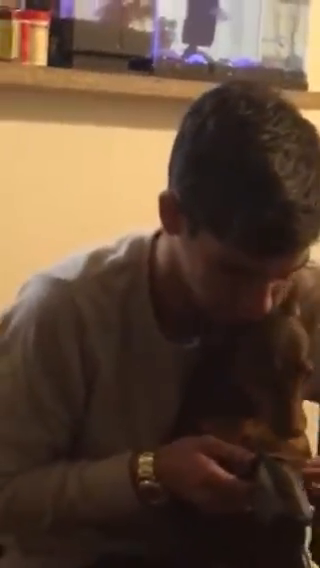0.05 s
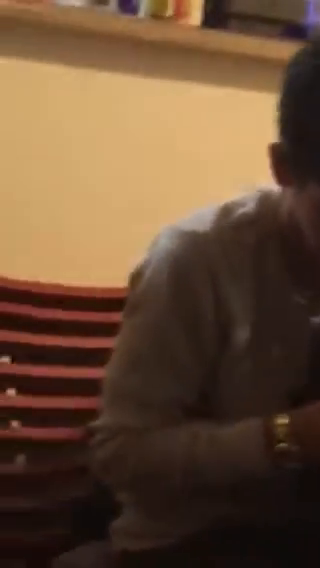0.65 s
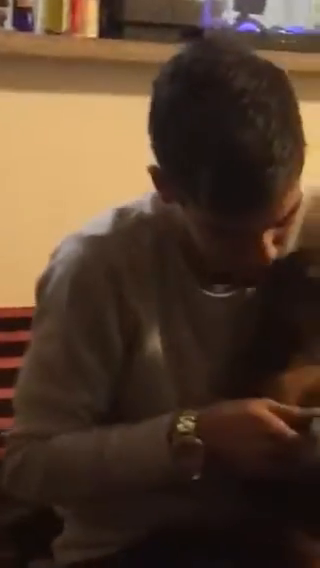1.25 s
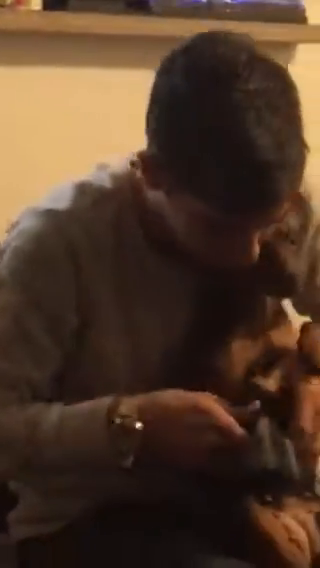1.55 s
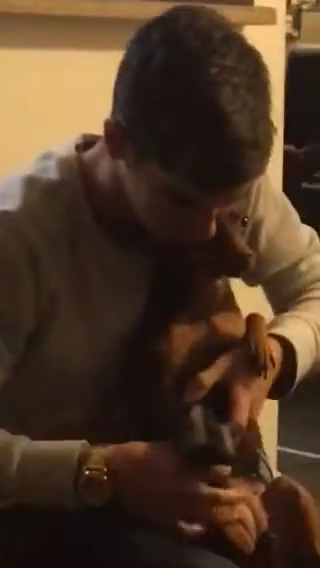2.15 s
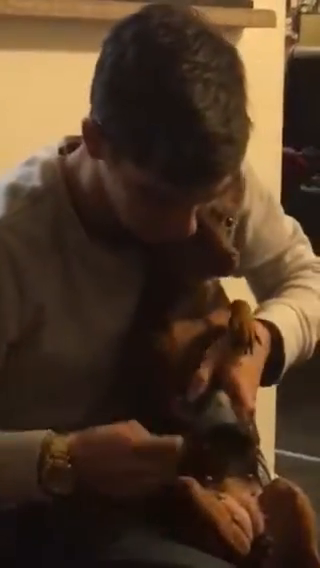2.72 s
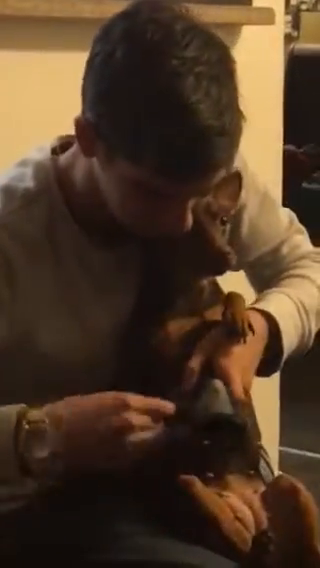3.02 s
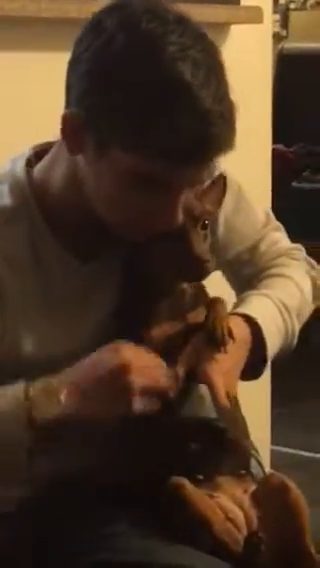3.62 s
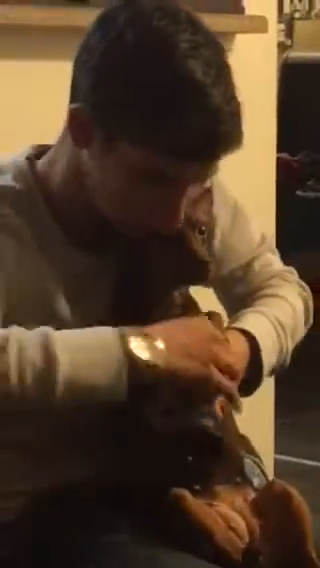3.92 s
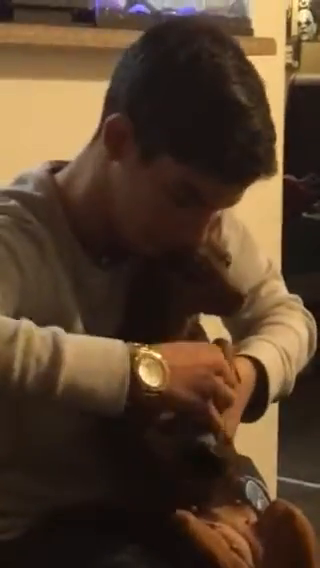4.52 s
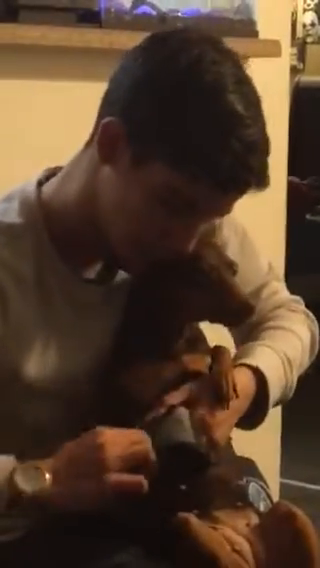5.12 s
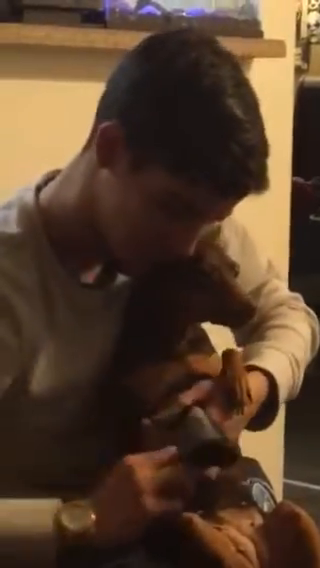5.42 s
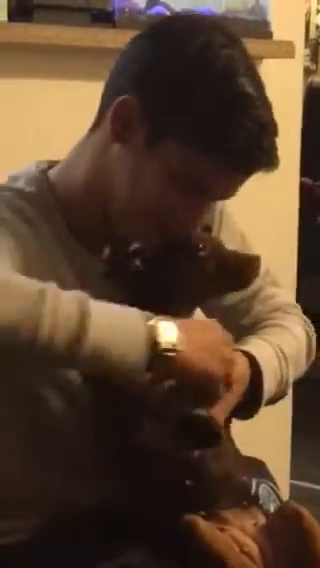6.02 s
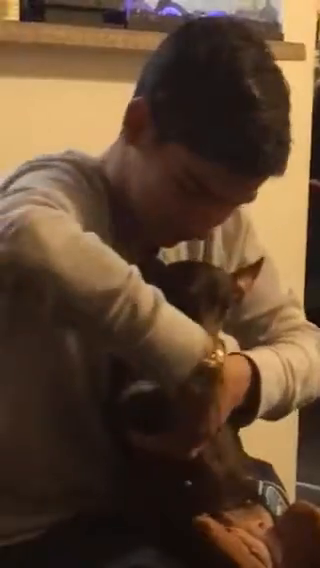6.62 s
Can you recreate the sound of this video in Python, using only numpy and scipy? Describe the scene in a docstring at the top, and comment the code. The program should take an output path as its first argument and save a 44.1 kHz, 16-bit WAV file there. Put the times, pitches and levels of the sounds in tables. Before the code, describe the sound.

A small fabric boot is being fitted on a dog's paw, close to one microphone in a living room with a short echo. An appliance's faint, low hum and thin hiss run steadily throughout. From the start, soft cloth rustle mixes with irregular light ticks of a hook-and-loop strap catching, and now and then a tiny hollow tap from the boot. Sharper clicks stand out at about 1.0, 2.0, 2.4 and 3.8 seconds. From about 4.7 to 5.5 seconds the strap peels open in a series of crisp, crackling jerks, much louder than anything else, densest around 4.9 seconds and thinning to a few separate snaps, with a brief swish of cloth near 5.4 seconds. Afterwards the quiet fingering goes on, with a few small ticks and taps around 5.7 to 6.2 seconds and faint rustling until the end, near 6.8 seconds.

```python
"""Cloth rustles and a hook-and-loop strap ticks close to the microphone, over an appliance's steady hum:
a small fabric boot is being fitted on a dog's paw in a living room, now and then giving a hollow tap.
From about 4.7 s the strap peels open in jerks, each freeing rows of snapping hooks; then the fingering
goes on. Lap, chest and a near wall reflect the handling into one microphone, ahead of a short room tail."""
import sys
import numpy as np
from scipy import signal
from scipy.fft import rfft, irfft, next_fast_len
from scipy.io import wavfile
from scipy.ndimage import map_coordinates

SR = 44100
rng = np.random.default_rng(int(sys.argv[2]) if len(sys.argv) > 2 else 0)


def digitize_waveform(pressure):
    """Quantize a signal to 16-bit integers and store it at the path in sys.argv[1].

    Rows of a 2-D input are taken as channels; values are limited to [-1, 1].
    """
    field = np.atleast_2d(pressure).T
    bounded = np.clip(field, -1, 1)
    quanta = np.round(bounded * 32767).astype(np.int16)
    wavfile.write(sys.argv[1], SR, quanta)


N = 297994

# The appliance's motor hum: mains_multiple, level_db
MOTOR_HUM = [(1, -69.5), (2, -59.5), (3, -70.5), (4, -73.5), (5, -77), (6, -75.5), (7, -81), (8, -84.5),
             (11, -84.5), (12, -85)]
# Tones of its rotating parts: pitch_hz, level_db
FAN_TONES = [(54.5, -82.5), (107.7, -72), (140.6, -78), (215.3, -66.5), (230.1, -76), (323, -78),
             (460.3, -89), (470.4, -78.5), (539, -84)]
# Thin whistles of the motor: pitch_hz, level_db
MOTOR_WHISTLES = [(2040, -92.5), (2821, -90), (2939, -93), (3720, -93.5)]
# Outline of the upper mains harmonics: frequency_hz, level_db
BUZZ_SPECTRUM = [(780, -99), (1250, -92.5), (1750, -101), (2500, -100), (2900, -100.5), (3100, -103)]
# Low background rumble: frequency_hz, gain_db
RUMBLE_SPECTRUM = [(20, -42), (35, -9), (55, -0.5), (80, -11), (112, 2.5), (128, -3.5), (145, -1.5),
                   (195, 0.5), (210, -7), (255, -4.5), (330, -15.5), (500, -35)]
# Room hiss: frequency_hz, gain_db
HISS_SPECTRUM = [(180, -35), (300, -2.5), (385, -8), (520, -8), (700, -11), (900, -14), (1210, -15),
                 (1750, -23.5), (2800, -25), (4500, -29.5), (8000, -27), (16000, -37)]
# Resonances in the appliance's hiss: centre_hz, width_hz, gain_db
WHINE_MODES = [(2540, 200, -8), (3770, 200, -14), (5850, 260, -8)]

# How busy the fingers are, as a relative rustle level: time_s, level_db
FINGERING = [(0, -67), (.2, -79), (.87, -93), (.95, -66), (1.18, -72.5), (1.33, -61), (1.42, -76),
             (1.85, -63.5), (2.3, -72.5), (2.6, -63.5), (2.8, -74.5), (3.3, -65.5), (3.45, -75.5),
             (3.98, -66), (4.5, -83), (5.64, -71.5), (5.77, -66.5), (6.4, -69), (6.6, -63.5), (6.76, -82)]
# Cloth, strap and fur sliding on each other, levels relative: middle_s, length_s, level_db
CLOTH_STROKES = [(0.355, 0.085, -59.5), (2.013, 0.061, -53.5), (2.144, .16, -64), (2.467, 0.1, -63),
                 (2.97, 0.067, -66), (4.27, 0.23, -64), (4.635, 0.075, -54), (4.895, 0.27, -51),
                 (5.381, 0.091, -47)]
# Colour of sliding cloth: frequency_hz, gain_db
CLOTH_SPECTRUM = [(500, -11), (1500, -4), (3000, -2.5), (4500, -5), (6500, 2), (9000, 2.5), (12000, 4),
                  (16000, 1.5)]
# Hooks, seams and claws catching, levels relative: start_s, level_db, body_gain_db
CLEAR_CATCHES = [(.133, -42, -4), (.3345, -44, -6), (.4037, -44.5, 9), (.4076, -43.5, 12.5),
                 (.9778, -44, -14), (1.0066, -33, -4), (1.451, -40.5, -19), (1.5146, -46.5, -14),
                 (1.723, -45, -8), (1.9875, -44, -6), (2.0429, -38, 4), (2.174, -41, -1), (2.391, -30, -4),
                 (2.4425, -36.5, -7), (3.1039, -44.5, -2), (3.2296, -52.5, 7.5), (3.709, -47, -5),
                 (3.7872, -38, -2), (3.961, -45.5, -11), (3.978, -43, -11), (4.0423, -47, -13),
                 (5.6774, -46.5, -2), (5.827, -52, -9), (6.08, -39.5, -22), (6.214, -47.5, -11)]
# Colour of a light catch: frequency_hz, gain_db
CATCH_SPECTRUM = [(300, -29), (600, -8), (1500, -9.5), (2400, -5.5), (4200, -7), (8000, -0.5), (13000, 0),
                  (16000, 1)]
# Hollow taps of the boot, levels relative: start_s, level_db, pitch_hz
BOOT_TAPS = [(0.167, -50, 1750), (.407, -57, 2310), (1.006, -47.5, 1340), (2.392, -44, 2300),
             (3.106, -49, 5700), (3.537, -52, 5850), (3.787, -44.5, 5270), (4.352, -54, 1610),
             (5.826, -44.5, 11600), (5.924, -47.5, 1130)]
# Modes of the boot: pitch_multiple, gain_db
BOOT_MODES = [(1, 6), (1.55, -3), (2.25, -1)]
# Jerks of the peeling strap, levels relative: start_s, level_db, body_gain_db, run_on_s
PEEL_JERKS = [(4.674, -26, -1.5, .003), (4.7041, -19.5, 1.5, 0.0081), (4.748, -19, -3.5, 0.0065),
              (4.7641, -21, -2, 0.026), (4.83, -22, 2, .004), (4.8663, -21, -3, 0.0045),
              (4.879, -19.5, -5.5, 0.0083), (4.8967, -18, -4.5, 0.023), (4.9634, -17.5, -7, 0.0041),
              (4.9934, -17.5, -0.5, 0.028), (5.088, -25, 1, 0.017), (5.1393, -22.5, 2.5, 0.04),
              (5.1905, -24.5, -8, 0.0048), (5.2197, -20.5, 1, 0.0028), (5.3315, -22, -1.5, 0.0029),
              (5.473, -31.5, 2, 0.0024)]
# Colour of a snapping hook: frequency_hz, gain_db
HOOK_SPECTRUM = [(240, -41), (400, -13), (645, -8), (814, -12), (1180, -8.5), (1760, -9.5), (2300, -3),
                 (3500, -7.5), (4400, -6.5), (6000, -0.5), (9300, 0), (12000, 1), (16000, -1)]
# Resonances of the taut strap: centre_hz, width_hz, gain_db
STRAP_MODES = [(680, 52, 0), (2900, 110, 1), (3400, 360, 7.5), (9640, 1400, 7)]

# Reflections off lap, chest and near wall: delay_s, gain_db
NEAR_ECHOES = [(.0019, -8), (.0031, -14), (.0051, -7.5), (.0066, -12), (.0093, -14)]
# Decay of the living room: frequency_hz, t60_s
ROOM_DECAY = [(300, 0.58), (1300, 0.35), (3500, 0.4), (9000, 0.25), (15000, 0.14)]
# Notches of the microphone port: centre_hz, width_hz, strength_db
PORT_NOTCHES = [(4910, 300, -6.5), (7600, 2340, -7.5), (10520, 370, -5.5)]


def amp(db):
    """Decibels to gain."""
    return 10 ** (np.asarray(db) / 20)


def unit(x):
    """Scale to rms 1."""
    return x / np.sqrt(np.mean(x ** 2) + 1e-20)


def along(points, hz):
    """Interpolate (frequency_hz, value) points on a log frequency axis."""
    point_hz, values = np.transpose(points)
    return np.interp(np.log(hz + 1), np.log(point_hz + 1), values)


def wobble(knots_per_s):
    """A smooth random curve."""
    knots = rng.standard_normal(int(N * knots_per_s / SR) + 4)
    return map_coordinates(knots, [np.arange(N) * knots_per_s / SR])


def filtered(x, response):
    """Apply a complex frequency response to x."""
    size = next_fast_len(N + SR // 2)
    return irfft(rfft(x, size) * response(np.fft.rfftfreq(size, 1 / SR)), size)[:N]


def coloured(x, spectrum, size=2048):
    """x through a minimum-phase filter of energy 1 with the given spectrum."""
    cepstrum = irfft(np.log(amp(along(spectrum, np.fft.rfftfreq(size, 1 / SR)))))
    cepstrum[1:size // 2] *= 2
    cepstrum[size // 2 + 1:] = 0
    pulse = irfft(np.exp(rfft(cepstrum)))
    return signal.fftconvolve(x, pulse / np.linalg.norm(pulse))[:N]


def resonances(modes, hz):
    """Summed response of band-pass modes."""
    return sum(amp(db) * 1j * hz * width / (centre ** 2 - hz ** 2 + 1j * hz * width)
               for centre, width, db in modes)


def add(track, start_s, sound):
    """Mix a sound into the track."""
    part = track[round(start_s * SR):][:len(sound)]
    part += sound[:len(part)]


def appliance(mains_hz=60.02):
    """In the background, a motor's mains hum and fan tones over a low rumble and a thin, whining hiss."""
    t = np.arange(N) / SR
    tones = [(round(multiple) * mains_hz, db) for multiple, db in MOTOR_HUM]
    tones += list(FAN_TONES) + list(MOTOR_WHISTLES)
    tones += [(hz, along(BUZZ_SPECTRUM, hz)) for hz in np.arange(13, 52) * mains_hz]
    # The microphone drifts through standing waves.
    sway = 1 + 0.066 * np.array([wobble(4.3), wobble(2.83), wobble(2.2)])
    hum = sum(amp(db) * sway[k % len(sway)] * np.sqrt(2) * np.sin(2 * np.pi * (hz * t + rng.random()))
              for k, (hz, db) in enumerate(tones))
    rumble = unit(filtered(rng.standard_normal(N), lambda hz: amp(along(RUMBLE_SPECTRUM, hz))))
    hiss = unit(filtered(rng.standard_normal(N), lambda hz: amp(along(HISS_SPECTRUM, hz))))
    whine = unit(filtered(rng.standard_normal(N), lambda hz: resonances(WHINE_MODES, hz)))
    return hum + amp(-60.5) * rumble + amp(-69) * hiss + amp(-87.5) * whine


def fingering_db(time_s):
    """Relative level of the fingering at a given time."""
    return np.interp(time_s, *np.transpose(FINGERING))


def cloth_rustle(grains_per_s=350):
    """Strokes swell and fade over the fingering: an uneven hiss with sparse grains of catching threads."""
    t = np.arange(N) / SR
    strokes = sum(amp(db) * np.exp(-np.abs(2 * (t - middle_s) / length_s) ** 3)
                  for middle_s, length_s, db in CLOTH_STROKES)
    speed = amp(fingering_db(t)) + strokes
    grains = (rng.random(N) < grains_per_s / SR) * rng.standard_normal(N)
    slide = unit(coloured(unit(grains) + 0.97 * rng.standard_normal(N), CLOTH_SPECTRUM))
    flutter = amp(-7.5 + 4.1 * wobble(55))
    return flutter * speed * slide


def snap_burst(length_s, snaps_per_s, fuzz, lead_db):
    """A first snap, then a dying row of further ones over a little fibre noise; energy 1."""
    t = np.arange(SR // 25) / SR
    released = rng.random(len(t)) < snaps_per_s / SR
    sizes = rng.choice([-1, 1], len(t)) * rng.uniform(0.7, 1, len(t))  # like hooks let go at like loads
    burst = (released * sizes + fuzz * rng.standard_normal(len(t))) * np.exp(-(t / length_s) ** 2)
    burst[0] = amp(lead_db)
    return burst / np.linalg.norm(burst)


def snaps_on_cloth(events, spectrum, body_hz, **burst_shape):
    """A burst for each event; its body below body_hz, moved by the backing cloth, has its own gain."""
    crisp, body = np.zeros(N), np.zeros(N)
    for start_s, db, body_gain_db in events:
        burst = amp(db) * snap_burst(**burst_shape)
        add(crisp, start_s, burst)
        add(body, start_s, burst * (amp(body_gain_db) - 1))
    body = filtered(body, lambda hz: 1 / (1 + 1j * hz / body_hz))
    return coloured(crisp + body, spectrum)


def faint_snags(count=120, snags_per_s=17, lift_db=13, spread_db=1, body_gain_db=-6):
    """Snags come at uneven intervals, stronger when the fingers are busy."""
    starts_s = (np.arange(count) + rng.random(count)) / snags_per_s
    levels_db = fingering_db(starts_s) + lift_db + spread_db * rng.standard_normal(count)
    return [(start_s, db, body_gain_db) for start_s, db in zip(starts_s, levels_db)]


def catch_ticks():
    """One hook or thread lets go sharply and tugs a few neighbours with it."""
    catches = list(CLEAR_CATCHES) + faint_snags()
    return amp(11.5) * snaps_on_cloth(catches, CATCH_SPECTRUM, body_hz=4600,
                                      length_s=0.0033, snaps_per_s=1200, fuzz=0.061, lead_db=-2.5)


def boot_taps(t60_s=0.0089):
    """Taps ring for a few milliseconds, at a pitch set by where the boot is held."""
    taps, t = np.zeros(N), np.arange(SR // 20) / SR
    for start_s, db, pitch_hz in BOOT_TAPS:
        ring = sum(amp(mode_db) * np.sin(2 * np.pi * pitch_hz * multiple * t)
                   for multiple, mode_db in BOOT_MODES if pitch_hz * multiple < SR / 2)
        ring *= amp(-60 * t / t60_s)
        add(taps, start_s, amp(db + 7.5) * ring / np.linalg.norm(ring))
    return taps


def hook_rows(followers=6, gap_s=0.009, gap_scatter=0.15, drop_db=5):
    """A jerk frees one row of hooks; further rows follow, ever weaker, until the pull is spent."""
    rows = []
    for start_s, db, body_gain_db, run_on_s in PEEL_JERKS:
        rows.append((start_s, db, body_gain_db))
        gaps_s = gap_s * np.exp(gap_scatter * rng.standard_normal(followers))
        for delay_s in np.cumsum(gaps_s):
            spent_db = 20 * np.log10(np.e) * (delay_s / run_on_s) ** 2 / 2  # a Gaussian fade
            rows.append((start_s + delay_s, db - drop_db - spent_db, body_gain_db))
    return rows


def strap_peel(midway_ring_db=-10, ring_growth_db=7):
    """Rows of snapping hooks ring the taut strap, more strongly as its free part grows."""
    hooks = snaps_on_cloth(hook_rows(), HOOK_SPECTRUM, body_hz=3480,
                           length_s=0.0042, snaps_per_s=4500, fuzz=0.12, lead_db=-8)
    freed = np.interp(np.arange(N) / SR, [PEEL_JERKS[0][0], PEEL_JERKS[-1][0]], [0, 1])
    drive = hooks * amp(midway_ring_db + ring_growth_db * (freed - 0.5))
    ring = filtered(drive, lambda hz: resonances(STRAP_MODES, hz))
    return amp(10) * (hooks + ring)


def living_room(direct, send, blocks=140, build_s=0.00084):
    """Near echoes, then a short diffuse room tail, drawn afresh for each block so it stays smooth."""
    near = filtered(direct, lambda hz: 1 + sum(amp(db) * np.exp(-2j * np.pi * hz * delay_s)
                                               for delay_s, db in NEAR_ECHOES))
    hz, t, noise = signal.stft(rng.standard_normal((blocks, SR // 3)), SR, nperseg=256)
    decay = amp(-60 * t / along(ROOM_DECAY, hz)[:, None])
    build = 1 - np.exp(-t / build_s)
    _, tails = signal.istft(noise * decay * build, SR, nperseg=256)
    wet, step = np.zeros(N), N // blocks + 1
    for k, tail in enumerate(tails):
        block = send[k * step:][:step]
        add(wet, k * step / SR, signal.fftconvolve(block, tail / np.linalg.norm(tail)))
    return near + wet


def scene():
    """The boot close by in the living room, the appliance behind it."""
    strap = strap_peel()
    handling = catch_ticks() + boot_taps() + cloth_rustle()
    send = amp(-0.3) * strap + amp(-1.5) * handling  # the hands shield the small sounds
    return (living_room(strap + handling, send) + appliance())[None]


def record(dry, top_hz=15900):
    """One microphone: its port notches the treble, and nothing is kept above top_hz."""
    return filtered(dry[0], lambda hz: (1 - resonances(PORT_NOTCHES, hz)) * (hz < top_hz))[None]


dry = scene()
out = record(dry)
digitize_waveform(out)
```